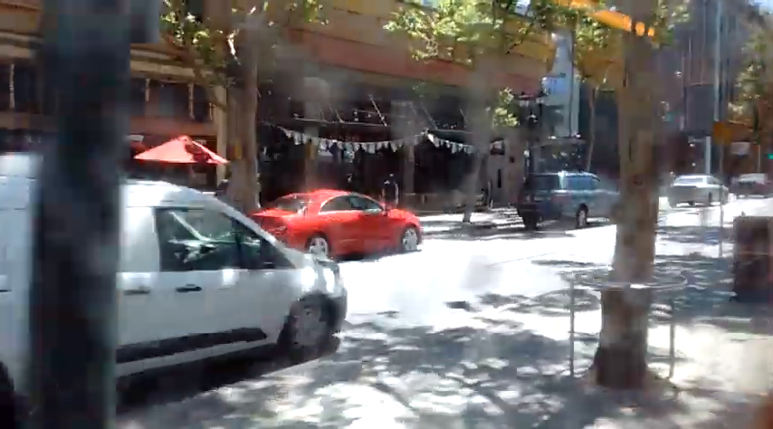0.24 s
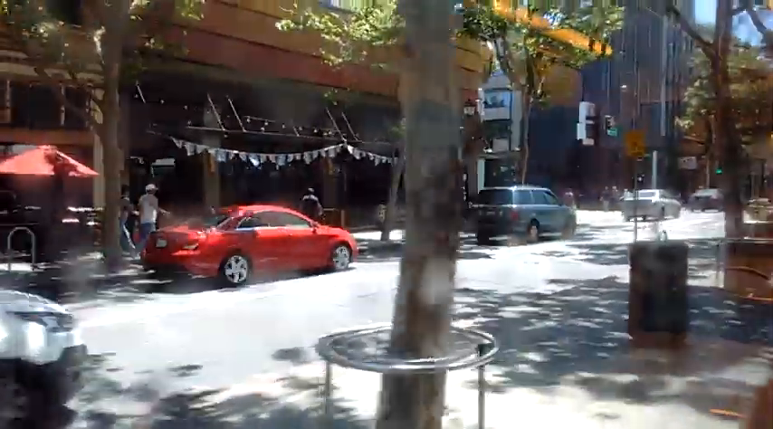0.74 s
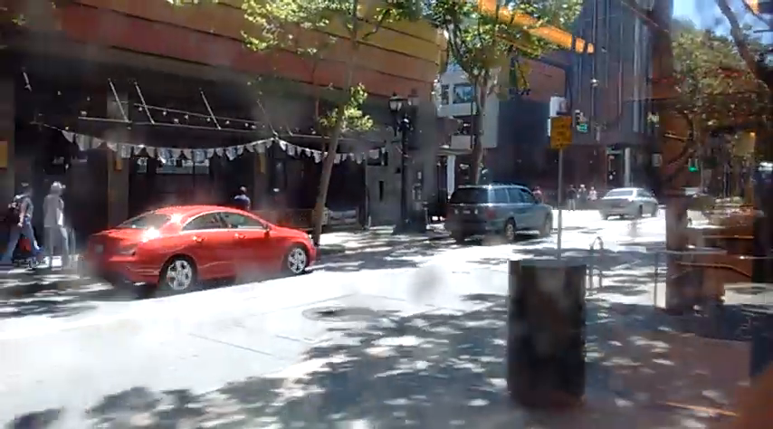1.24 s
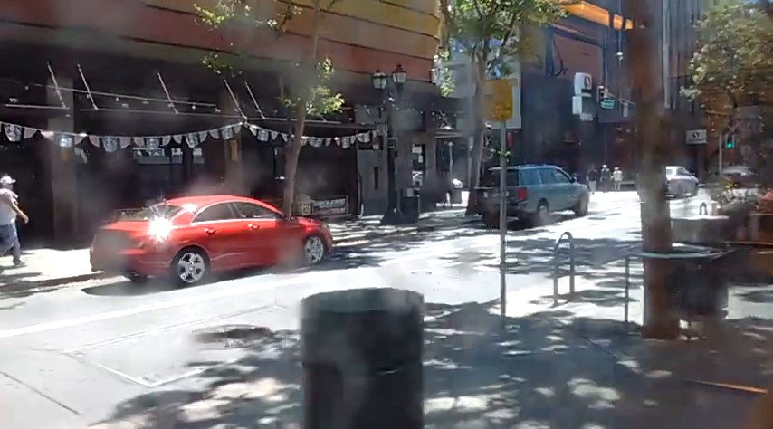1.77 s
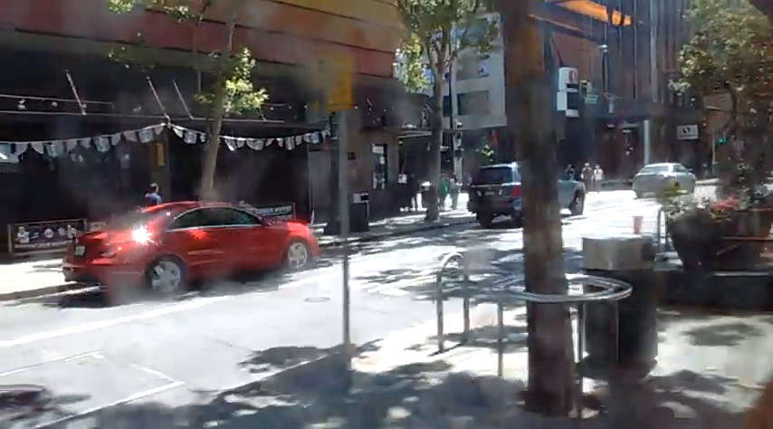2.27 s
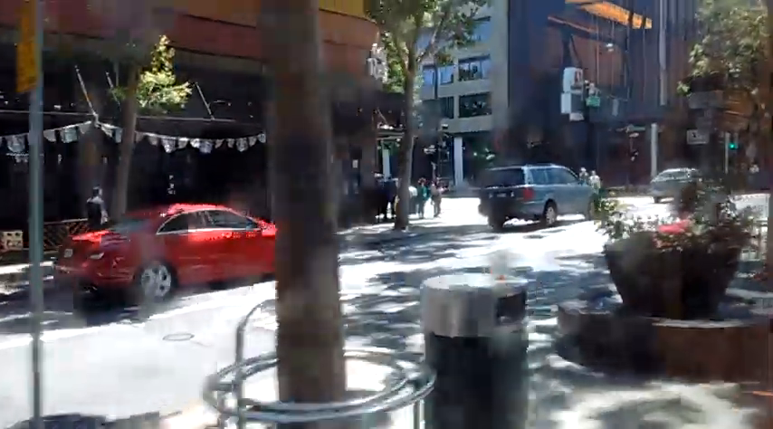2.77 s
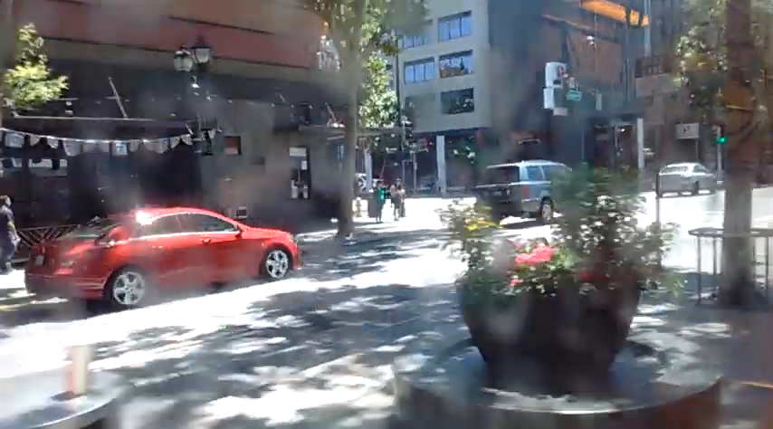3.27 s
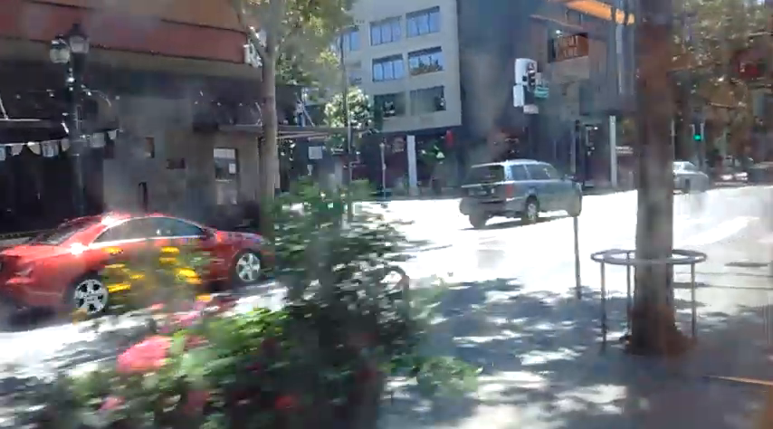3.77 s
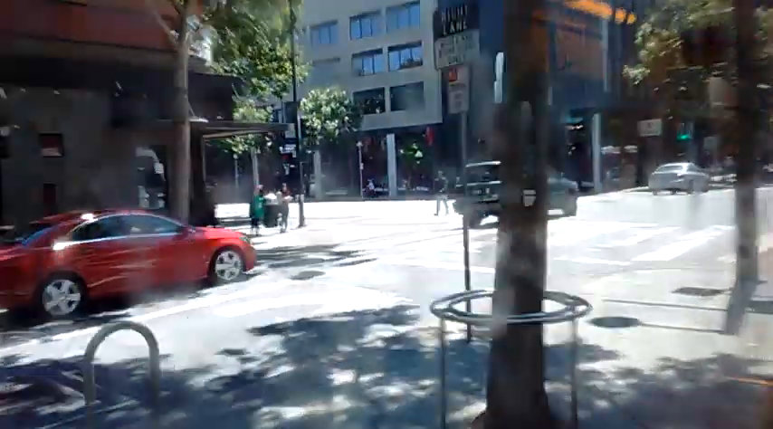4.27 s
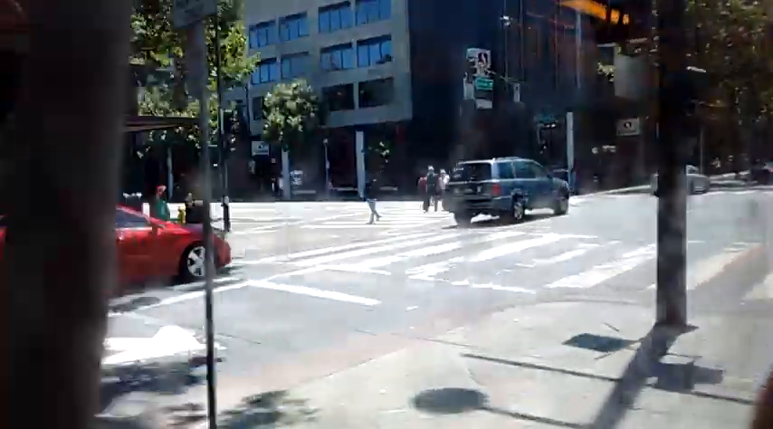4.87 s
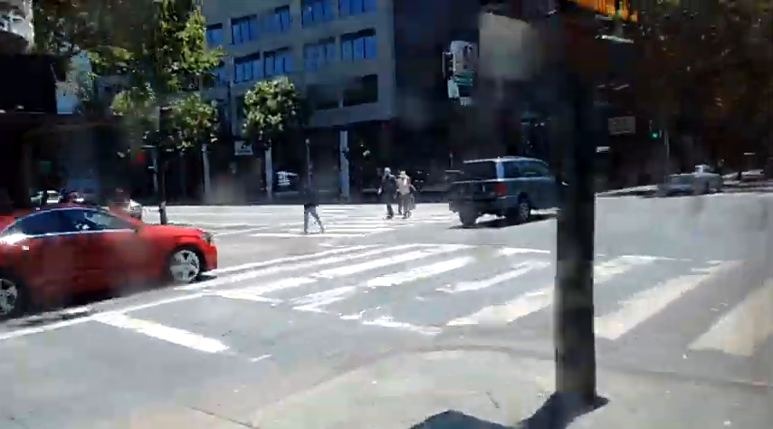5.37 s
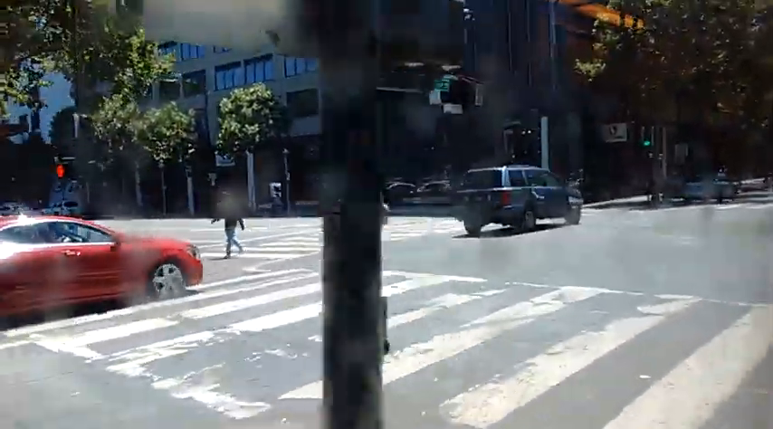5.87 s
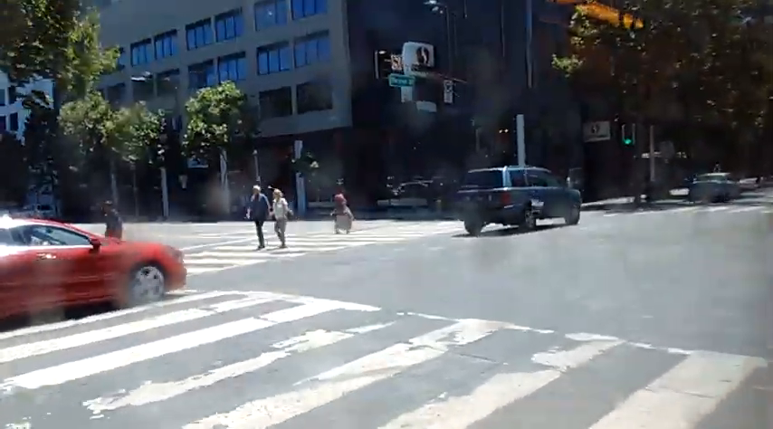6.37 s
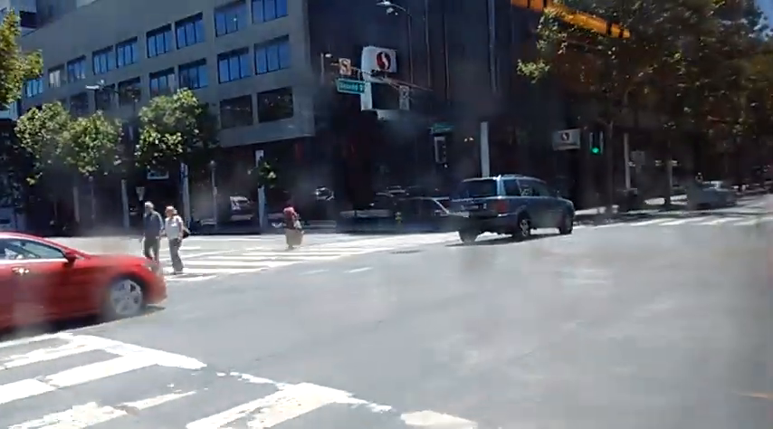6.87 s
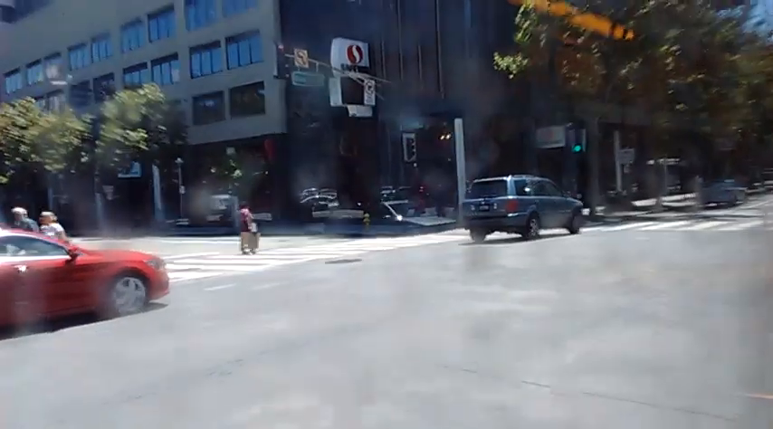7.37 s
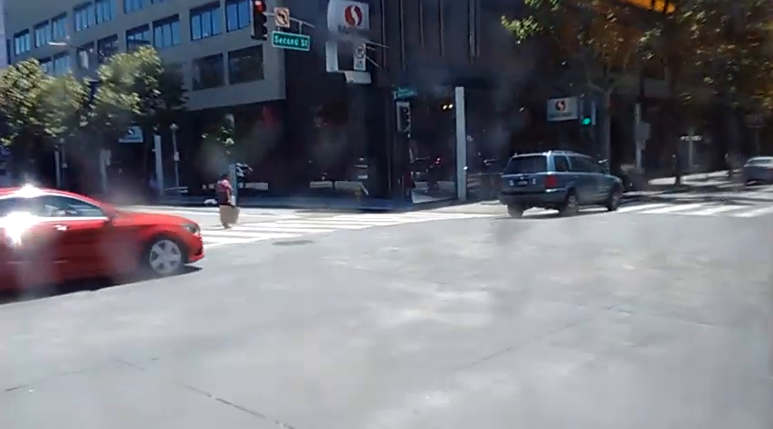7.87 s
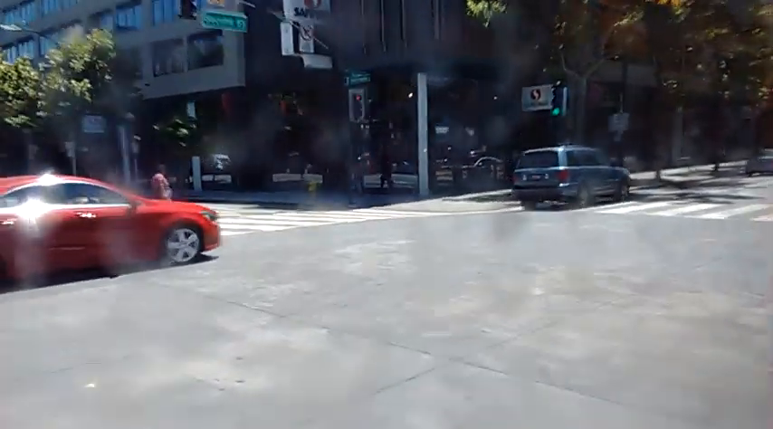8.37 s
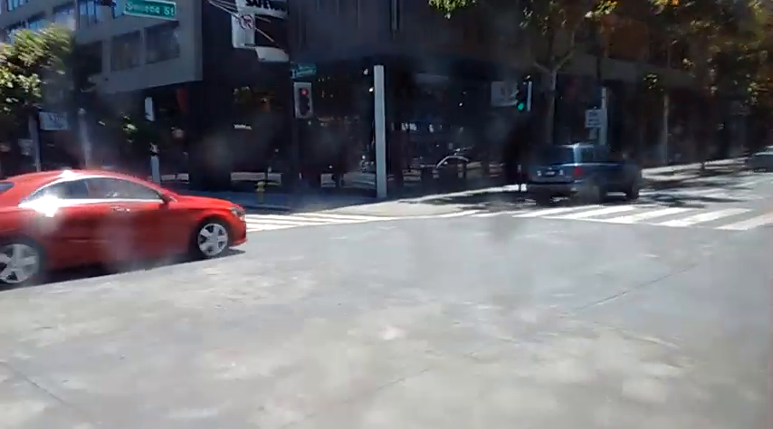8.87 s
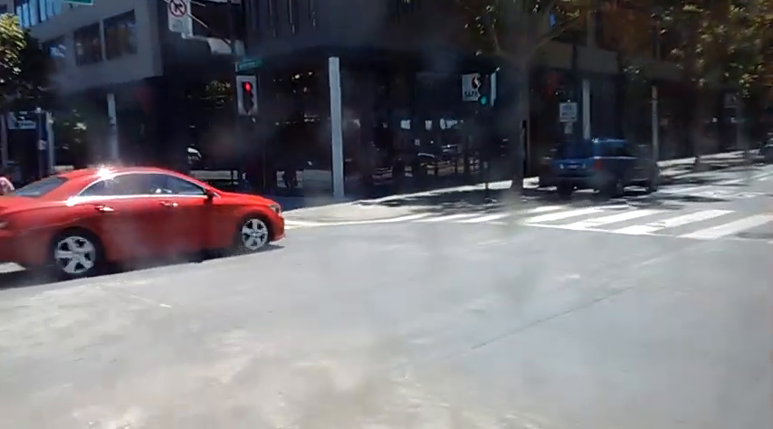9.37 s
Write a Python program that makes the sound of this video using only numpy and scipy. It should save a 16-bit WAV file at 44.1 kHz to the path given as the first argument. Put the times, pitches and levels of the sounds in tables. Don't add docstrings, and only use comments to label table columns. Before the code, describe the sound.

Deep booming cabin air dominates, beating and fluttering several times a second as the tram rolls on. Rougher rail stretches bring hollow drumming and growl; a dull airy hiss gusts early, thins around six seconds and is weakest after eight. A faint high drive whine and gear hum stay underneath, with a small rattle late and a brief air puff at the end. Two microphones by the window, wide bass, dark treble, loud swells squashed.

```python
import sys
import numpy as np
from scipy import signal
from scipy.fft import rfft, irfft, next_fast_len
from scipy.io import wavfile
from scipy.ndimage import uniform_filter1d, minimum_filter1d

SR = 44100
rng = np.random.default_rng(int(sys.argv[2]) if len(sys.argv) > 2 else 0)


def inscribe(sig):
    pcm = np.round(np.clip(np.atleast_2d(sig).T, -1, 1) * 32767)
    wavfile.write(sys.argv[1], SR, pcm.astype(np.int16))


def magnitude_from_level(level_db):
    exponent = np.asarray(level_db, float) / 20
    return 10 ** exponent


N = 424241
STEP = 32
AUDIO_S = np.arange(N) / SR
CONTROL_S = np.arange(N // STEP + 2) * STEP / SR


def evened(x):
    return x / np.sqrt(np.mean(np.square(x)) + 1e-20)


def read(points, hz):
    f, value = np.transpose(points)
    return np.interp(np.log(hz + 1), np.log(f + 1), value)


def swells(rows, t):
    s, length = np.transpose(rows)[:2, :, None]
    return np.exp(-2.88 * ((t - s) / length) ** 2)


def wander(width_hz):
    shape = (2, len(CONTROL_S))
    slow = rng.standard_normal(shape) + 1j * rng.standard_normal(shape)
    r = np.exp(-np.pi * width_hz * STEP / SR)
    once = signal.lfilter([1 - r], [1, -r], slow + 1e-18)
    return signal.lfilter([1 - r], [1, -r], once)


def resonate(hz, slow, evenness=0.):
    slow = slow / abs(slow) ** evenness
    turn = np.exp(2j * np.pi * hz * AUDIO_S)
    return evened([(turn * np.interp(AUDIO_S, CONTROL_S, s)).real for s in slow])


def field(level_db, size, patchy_db, flicker_db):
    hop = size // 4
    hz = np.fft.rfftfreq(size, 1 / SR)
    t = np.arange(N // hop + 5) * hop / SR
    draw = rng.standard_normal((len(t), len(hz), 5)).T
    patches = uniform_filter1d(draw[4], size=16, axis=0)
    patches = evened(uniform_filter1d(patches, size=12, axis=1))
    flicker = evened(uniform_filter1d(rng.standard_normal(len(t)), size=5))
    gain = magnitude_from_level(level_db(hz[:, None], t) + patchy_db * patches + flicker_db * flicker)
    z = draw[:2] + 1j * draw[2:4]
    white = np.std(signal.istft(z[0], nperseg=size, noverlap=size - hop)[1])
    noise = signal.istft(z * gain, nperseg=size, noverlap=size - hop)[1][:, :N]
    return noise * np.sqrt(SR / 2) / white


# pitch in Hz, width in Hz.
CABIN_MODES = [(84, 10), (102, 13)]
# centre in seconds, length in seconds, peak in dB.
LOW_JOLTS = [(0.62, 0.14, -14), (1.855, 0.032, -6), (2.115, 0.15, -7), (2.436, 0.21, -12.5),
             (3.144, 0.052, -10), (3.49, 0.14, -23), (4.055, 0.08, -16.0), (4.46, 0.07, -24),
             (4.647, 0.06, -12.0), (4.81, 0.08, -17), (5.2, 0.11, -22), (5.574, 0.06, -15),
             (5.69, 0.09, -8), (5.87, 0.042, -5.5), (6.18, 0.045, -15), (6.316, 0.043, -7.5),
             (6.52, 0.09, -15.5), (6.652, 0.035, -9), (6.956, 0.032, -7), (7.407, 0.21, -12.5),
             (7.59, 0.036, -3.5), (7.787, 0.08, -8), (7.945, 0.05, -6), (8.137, 0.058, -3.5),
             (8.4, 0.36, -19), (8.698, 0.13, -8), (9.022, 0.028, -5), (9.14, 0.1, -13), (9.275, 0.063, -7),
             (9.57, 0.05, -11.5)]
# centre in seconds, length in seconds, peak in dB.
HIGH_JOLTS = [(0.078, 0.05, -11), (0.403, 0.5, -22), (0.754, 0.22, -18), (1.074, 0.11, -8),
              (1.283, 0.035, -12), (2.244, 0.06, -18.5), (2.582, 0.06, -17), (2.74, 0.093, -14.5),
              (2.992, 0.072, -6), (3.184, 0.046, -8), (3.268, 0.04, -16.0), (3.37, 0.11, -8.5),
              (3.58, 0.17, -16), (4.154, 0.34, -17.5), (4.498, 0.064, -16), (4.88, 0.76, -16.5),
              (5.46, 0.077, -13), (5.59, 0.035, -20), (5.968, 0.31, -13.0), (6.33, 0.32, -17),
              (6.61, 0.13, -20), (6.81, 0.084, -9.5), (7.33, 0.11, -28), (7.78, 0.06, -12),
              (7.898, 0.05, -10), (8.052, 0.057, -16.0), (8.22, 0.12, -23), (8.587, 0.16, -9),
              (8.903, 0.15, -21), (9.48, 0.2, -17)]
# centre in seconds, length in seconds, level change in dB.
BOOM_LULLS = [(0.25, 0.048, 1), (0.35, 0.026, -9), (0.533, 0.04, -15), (0.737, 0.024, -14),
              (0.94, 0.08, -15), (1.228, 0.034, -5), (1.323, 0.046, -8), (1.573, 0.078, -3),
              (1.894, 0.043, -12), (2.323, 0.08, -6), (2.667, 0.09, -2), (2.933, 0.12, -5.5),
              (3.315, 0.044, -14), (3.71, 0.1, -13), (4.341, 0.061, -13), (4.7, 0.054, -3),
              (5.082, 0.03, -12), (5.324, 0.046, -10), (5.634, 0.037, -14), (5.748, 0.04, -6),
              (6.06, 0.024, -11), (6.704, 0.05, -7), (7.101, 0.025, -2), (7.548, 0.026, -9),
              (7.704, 0.093, -4.5), (7.907, 0.089, -3), (7.997, 0.034, -1), (8.256, 0.022, -11),
              (8.834, 0.034, -5), (9.064, 0.026, -8)]


def boom():
    def mode_size(jolts, bed_db, rise_db_per_s):
        return magnitude_from_level(bed_db + rise_db_per_s * CONTROL_S) + magnitude_from_level(np.transpose(jolts)[2]) @ swells(jolts, CONTROL_S)
    low_size = mode_size(LOW_JOLTS, bed_db=-19.5, rise_db_per_s=0.73)
    high_size = mode_size(HIGH_JOLTS, bed_db=-20.5, rise_db_per_s=0.44)
    power = low_size ** 2 + high_size ** 2
    upper = high_size ** 2 / power
    (low_hz, low_width_hz), (high_hz, high_width_hz) = CABIN_MODES
    low, high = (w / abs(w) ** 0.39 for w in (wander(low_width_hz), wander(high_width_hz)))
    beat = np.exp(2j * np.pi * (high_hz - low_hz) * CONTROL_S)
    both = np.sqrt(1 - upper) * low + np.sqrt(upper) * high * beat
    lull_db = np.transpose(BOOM_LULLS)[2] @ swells(BOOM_LULLS, CONTROL_S)
    envelope = np.interp(AUDIO_S, CONTROL_S, np.sqrt(power) * magnitude_from_level(lull_db))
    swing = magnitude_from_level(-1.5) * envelope * resonate(low_hz, both, evenness=0.61)
    band = signal.butter(2, [64, 128], "band", fs=SR, output="sos")
    return signal.sosfiltfilt(band, swing)


# time in seconds, level in
# dB.
RIDE_LEVEL = [
    (0, -34),
    (0.5, -36.5),
    (1.5, -36),
    (2.1, -32),
    (3.5, -34),
    (5.75, -34.5),
    (5.95, -39),
    (7.4, -34.5),
    (8.3, -41),
    (9.62, -36.5),
]
# centre in seconds, length in
# seconds, rush in dB, hiss in dB.
AIRFLOW_CHANGES = [(0.423, 0.26, 4, 4.5), (0.746, 0.11, 2, 1.5), (1.067, 0.3, 4, 4), (1.397, 0.1, 3, 3),
                   (1.87, 0.23, 1.0, 1.0), (2.5, 0.2, -1.5, -1), (2.805, 0.093, -2.5, -3),
                   (3.07, 0.26, -1.5, -0.5), (3.1, 0.06, 2.5, 3), (3.24, 0.08, 0.5, 1), (3.543, 0.25, 1, 4.0),
                   (4.604, 0.37, 1.5, 2), (5.16, 0.054, 1, 2.5), (5.37, 0.039, -0.5, 2.5),
                   (5.507, 0.067, -2.5, 0), (6.272, 0.069, 4, 3.0), (6.47, 0.065, 2, 0),
                   (7.162, 0.33, -2.5, -3.5), (7.63, 0.13, -2.5, -4), (8.07, 0.2, 2.5, 1.5),
                   (8.57, 0.41, 3, 3), (8.833, 0.08, -3, -0.5), (9.054, 0.08, 3.5, 1.5),
                   (9.364, 0.1, -4.0, -3.0)]


def airflow_db(t):
    mean_db, hiss_share = -35.5, 1.15
    ride_db = np.interp(t, *np.transpose(RIDE_LEVEL)) - mean_db
    gusts_db = np.transpose(AIRFLOW_CHANGES)[2:] @ swells(AIRFLOW_CHANGES, t)
    return np.array([ride_db, hiss_share * ride_db]) + gusts_db


# centre in seconds, length in seconds, change
# in dB, pitch affected in Hz.
DRUM_STRETCHES = [(.26, .74, 7, 171), (.35, .3, 6.5, 390), (1.53, 0.11, -6, 775), (1.64, .2, -2, 170),
                  (1.9, .3, -14, 50), (2.29, 0.14, 2, 775), (2.752, 0.24, -8, 775),
                  (3.496, 0.08, 11.5, 300), (3.72, .15, -7, 60), (3.807, 0.11, -7, 170),
                  (4.252, .14, 10, 390), (4.598, 0.22, 12, 300), (5.25, 0.38, 12, 55),
                  (5.57, 0.13, -8, 390), (5.8, 0.12, 7, 388), (6.05, 0.25, -4.5, 775),
                  (6.36, 0.46, 11, 370), (6.838, 0.11, 8.5, 172), (6.84, 0.27, 4.5, 775),
                  (7.122, 0.19, -6, 775), (7.368, 0.34, 6.5, 392), (7.38, .3, -2, 149),
                  (7.947, 0.32, 1.5, 775), (8.29, 0.12, -7, 360), (8.77, 0.67, -6.5, 775),
                  (8.784, .19, 8, 175), (9.07, 0.16, 8, 172), (9.34, 0.25, -4.5, 775),
                  (9.558, 0.22, 8.5, 167), (7.88, .4, 2.5, 165)]


def roughness_db(hz, t):
    reach_oct, gust_share = 0.33, 0.29
    drift_db_per_s, deep_drift_db_per_s, deep_hz = 0.13, -1, 145
    db, pitch_hz = np.transpose(DRUM_STRETCHES)[2:]
    near = np.exp(-(np.log2(hz / pitch_hz) / reach_oct) ** 2)
    shaken_db = (db * near) @ swells(DRUM_STRETCHES, t)
    drift_db = (drift_db_per_s + deep_drift_db_per_s * (hz < deep_hz)) * (t - t.mean())
    return shaken_db + drift_db + gust_share * airflow_db(t)[0]


# pitch in Hz, width in Hz, rms in dB.
PANEL_MODES = [(60.2, 4.9, -33.5), (135.4, 8.5, -28), (160.1, 21.3, -28.5), (181, 28.7, -25),
               (391, 25.7, -37), (769.6, 135, -37), (298.7, 91, -37.5)]


def panels():
    out = np.zeros((2, N))
    for hz, width_hz, db in PANEL_MODES:
        shake_db = np.interp(AUDIO_S, CONTROL_S, roughness_db(hz, CONTROL_S))
        out += magnitude_from_level(db + shake_db) * resonate(hz, wander(width_hz), evenness=0.15)
    return out


# frequency in Hz, density in dB per Hz.
RUMBLE_SPECTRUM = [(20, -49.5), (42, -65), (65, -45.5), (80, -39), (110, -39), (195, -49), (215, -50),
                   (300, -52.5), (350, -52.5), (440, -56.5), (560, -68.5), (900, -70.5), (1400, -72),
                   (2500, -130)]


def rumble():
    def level_db(hz, t):
        floor_db = 0.39 * roughness_db(hz + 1, t)
        rush_db = 0.96 * (airflow_db(t)[0] - 0.8)
        return read(RUMBLE_SPECTRUM, hz) + floor_db + rush_db
    return field(level_db, size=2048, patchy_db=1.1, flicker_db=2.3)


# frequency in Hz, density in dB per Hz.
AIR_SPECTRUM = [(300, -90), (600, -60.5), (950, -70), (1600, -65.5), (2100, -68), (2550, -67.5),
                (2900, -77), (4500, -80), (5000, -85.5), (7000, -93), (10000, -99), (12000, -107),
                (14500, -108), (16000, -112)]


def rush():
    def level_db(hz, t):
        rush_db, hiss_db = airflow_db(t) - 0.8
        share = np.clip(np.log2((hz + 1) / 2400) / 0.78, 0, 1)
        share_top = np.clip(np.log2(18000 / (hz + 1)), 0.4, 1)
        return read(AIR_SPECTRUM, hz) + (1 - share) * rush_db + share * share_top * hiss_db
    return field(level_db, size=512, patchy_db=0.86, flicker_db=0.3)


# pitch in Hz, rms in dB, waver in Hz.
DRIVE_TONES = [
    (2029, -55, 2.5),
    (3995, -67, 6),
    (12048, -89, 5),
]


def whine():
    return sum(magnitude_from_level(db) * resonate(hz, wander(waver_hz), evenness=0.87) for hz, db, waver_hz in DRIVE_TONES)


# pitch in Hz, width in Hz, rms in dB.
GEAR_STRANDS = [
    (396.3, 9.7, -44.5),
    (792, 16, -46.5),
    (1607, 29, -49.5),
]


def hum():
    rise_db = 0.37 * (CONTROL_S - CONTROL_S.mean())
    out = np.zeros((2, N))
    for hz, width_hz, db in GEAR_STRANDS:
        level_db = roughness_db(min(hz, 800), CONTROL_S) + rise_db
        gain = magnitude_from_level(db + np.interp(AUDIO_S, CONTROL_S, level_db))
        out += gain * resonate(hz, wander(width_hz), evenness=0.36)
    return out


# start in seconds, peak in dB.
TRIM_TICKS = [
    (3.029, -54),
    (3.849, -50),
    (8.640, -45),
    (8.652, -47),
    (8.663, -45),
]


def rattles():
    t = np.arange(600) / SR
    out = np.zeros((2, N + 600))
    grits = rng.standard_normal((len(TRIM_TICKS), 2, 601))
    for (start_s, db), grit in zip(TRIM_TICKS, grits):
        at = round(start_s * SR)
        out[:, at:at + 600] += magnitude_from_level(db - 7 - 60 * t / 0.02) * np.diff(grit)
    return out[:, :N]


# start in seconds, end in seconds, rms in dB.
VALVE_PUFFS = [
    (3.11, 3.4, -50.5),
    (3.47, 3.65, -51),
    (9.55, 9.7, -48),
]


def puffs():
    band = signal.butter(4, [7000, 13400], "band", fs=SR, output="sos")
    thin = signal.sosfilt(band, rng.standard_normal((2, N)))
    fade_s = 0.1
    gain = np.zeros(N)
    for start_s, end_s, db in VALVE_PUFFS:
        gain += magnitude_from_level(db) * np.clip(np.minimum(AUDIO_S - start_s, end_s - AUDIO_S) / fade_s, 0, 1)
    return thin * gain


def scene():
    return boom() + panels() + rumble() + rush() + whine() + hum() + rattles() + puffs()


# frequency in Hz, phase in half turns.
RIGHT_TURN = [(0, 1), (400, .97), (900, .72), (1150, .2), (1450, 0), (2150, -.33), (2600, -.87), (2900, -1),
              (3800, -1.07), (4100, -1.9), (5100, -2.02), (5800, -1.2), (6600, -.95), (8000, 0), (9200, .65),
              (10400, 1), (11300, 1.3), (11800, 2), (12700, 2), (13500, 3), (14400, 3), (14800, 4)]
# frequency in Hz, coherence from 0 to 1.
PORT_COHERENCE = [(350, .999), (700, .9), (1000, .55), (1550, .97), (2450, .6), (3050, .92), (3950, .15),
                  (4650, .86), (5500, .2), (6400, .95), (6900, .63), (8200, .68), (9000, .35), (11500, .3),
                  (14000, .75)]
# frequency in Hz, right minus left in dB.
PORT_LEVEL = [(100, -1.7258), (400, -2), (1000, -6), (1500, -4), (2300, -5), (3200, -5), (4200, -2.5),
              (6000, -0.5), (7300, 6.5), (8500, 6.5), (10500, 0), (12000, -1)]


def two_ports(dry):
    lead = 2048
    size = next_fast_len(N + 2 * lead)
    wide = np.pad(dry, [(0, 0), (lead, size - N - lead)], "reflect", reflect_type="odd")
    hz = np.fft.rfftfreq(size, 1 / SR)
    near, scattered = rfft(wide * signal.windows.tukey(size, lead / size))
    same = np.clip(read(PORT_COHERENCE, hz), 0, 1)
    turn = np.exp(1j * np.pi * np.interp(hz, *np.transpose(RIGHT_TURN)))
    right = magnitude_from_level(read(PORT_LEVEL, hz)) * (same * turn * near + np.sqrt(1 - same ** 2) * scattered)
    return np.array([dry[0], irfft(right, size)[lead:lead + N]])


def limited(pair):
    limit, window_samples = 1.03, 900
    peak = -minimum_filter1d(-abs(pair).max(0), size=window_samples)
    pair = pair / uniform_filter1d(np.maximum(peak / limit, 1), size=window_samples)
    return pair / (1 + pair ** 40) ** (1 / 40)


def band_limit(x):
    return signal.sosfilt(signal.butter(12, 15300, fs=SR, output="sos"), x)


def record(dry):
    mix = limited(two_ports(dry))
    return band_limit(mix)


dry = scene()
out = record(dry)
inscribe(out)
```